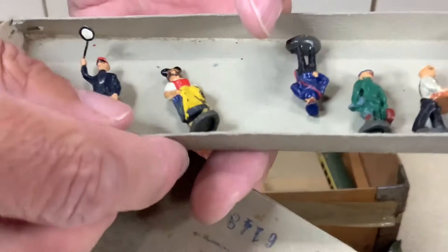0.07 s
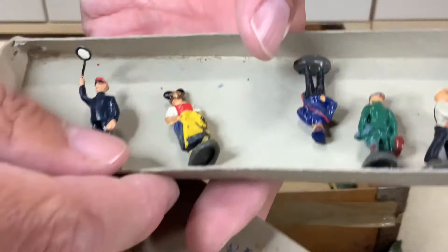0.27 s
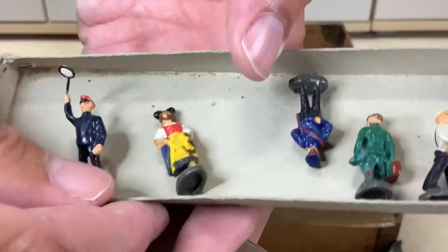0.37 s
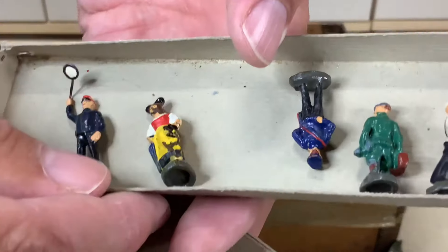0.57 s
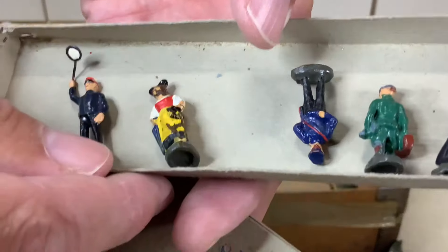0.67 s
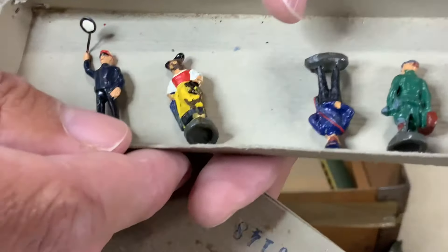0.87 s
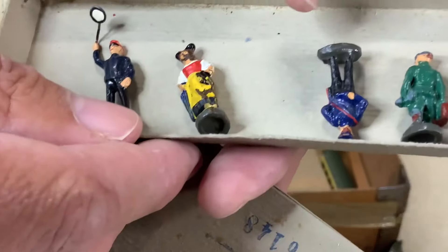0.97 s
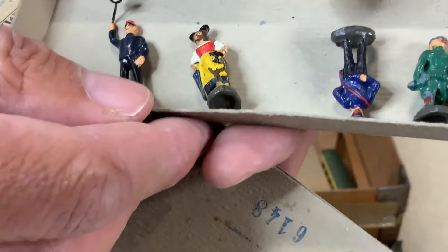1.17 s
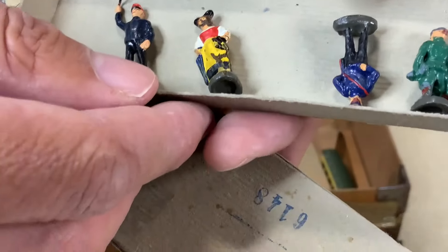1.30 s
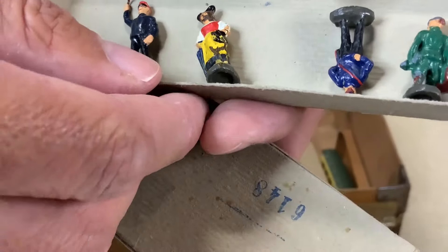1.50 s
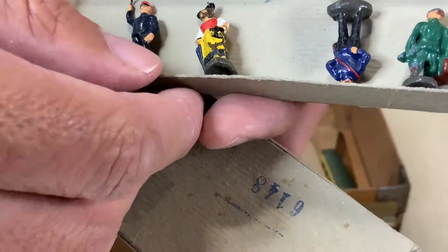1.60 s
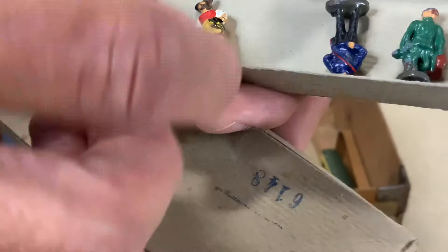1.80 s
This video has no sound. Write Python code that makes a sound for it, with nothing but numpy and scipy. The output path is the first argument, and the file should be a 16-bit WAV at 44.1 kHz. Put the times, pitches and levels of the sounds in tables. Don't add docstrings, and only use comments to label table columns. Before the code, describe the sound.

Fingers rub and shift an old card box indoors, with dry scuffs and a loud hollow clack

```python
import sys
import numpy as np
from scipy import signal
from scipy.fft import rfft, irfft
from scipy.io import wavfile
from scipy.ndimage import uniform_filter1d

SR = 44100
rng = np.random.default_rng(int(sys.argv[2]) if len(sys.argv) > 2 else 0)


def level_to_linear(level):
    exponent = np.asarray(level, float) / 20
    return 10 ** exponent


def materialize(psi):
    bounded = np.clip(np.atleast_2d(psi).T, -1, 1)
    quanta = np.round(bounded * 32767).astype(np.int16)
    wavfile.write(sys.argv[1], SR, quanta)


N = 81585
T = np.arange(N) / SR
HZ = np.fft.rfftfreq(N, 1 / SR)


def evened(x):
    return x / np.sqrt(np.mean(x ** 2) + 1e-20)


def read(points, hz=HZ):
    f, value = np.transpose(points)
    return np.interp(np.log(hz + 1), np.log(f + 1), value)


def colour(x, gain):
    return irfft(rfft(x) * gain, N)


def grit(per_s, spread_db, share, flicker_db, size):
    slip_size = level_to_linear(spread_db * np.minimum(rng.exponential(1, N), 4))
    slips = rng.standard_normal(N) * slip_size * (rng.random(N) < per_s / SR)
    flicker = evened(uniform_filter1d(uniform_filter1d(rng.standard_normal(N), size), size))
    rub = share * evened(slips) + (1 - share) * rng.standard_normal(N)
    return rub * level_to_linear(flicker_db * flicker)


def rings(modes, t, stretch, detune, rise_s):
    total = 0
    for (hz, db, t60), d in zip(modes, detune):
        total = total + level_to_linear(db - 60 * t / (t60 * stretch)) * np.sin(2 * np.pi * hz * d * t)
    return total * (1 - np.exp(-t / rise_s))


# pitch in Hz, width in Hz, level in dB.
PANEL_MODES = [(255, 130, -9), (377, 100, -4), (534.4, 116, 13.5), (801.5, 30, 2.5), (994, 140, -8),
               (1285, 91, -0.5), (1582, 53, -10.5), (2547, 55, 3), (3095, 110, 1.5), (3716, 1000, -4.5),
               (4320, 200, -14.5), (4950, 69, -1.5)]


def panels(floor):
    peaks = sum(level_to_linear(g) / np.sqrt(1 + (2 * (HZ - f) / w) ** 4) for f, w, g in PANEL_MODES)
    return floor + peaks


# peak in seconds, rise in seconds, fall in seconds, hiss in dB,
# card sound against the hiss in dB.
STROKES = [(0.042, 0.24, 0.07, -55.5, 3), (0.093, 0.1, 0.075, -54.5, -4), (0.167, 0.015, 0.0037, -49, 0),
           (0.252, 0.098, 0.082, -40.5, -2), (0.318, 0.069, 0.11, -42.5, 0), (0.396, 0.14, 0.066, -61, 15),
           (0.479, 0.019, 0.11, -60, -15), (0.59, 0.12, 0.1, -58, 9), (0.652, 0.045, 0.072, -64.5, 7),
           (0.709, 0.058, 0.11, -59, 6.5), (0.758, 0.033, 0.045, -59, -3), (0.892, 0.052, 0.12, -86, 17),
           (1.128, 0.035, 0.057, -63, -3), (1.171, 0.026, 0.085, -69.5, -4.5),
           (1.263, 0.04, 0.055, -52.5, 1), (1.30, 0.015, 0.062, -65, -1), (1.421, 0.07, 0.061, -63, -2),
           (1.47, 0.048, 0.063, -61.5, -5), (1.518, 0.033, 0.092, -56.5, -5.5),
           (1.638, 0.041, 0.049, -52, -6), (1.699, 0.045, 0.043, -54, -0.5), (1.743, 0.045, 0.075, -57, 0)]
# pitch in Hz, level in dB per Hz.
SKIN_COLOUR = [(3500, -48), (5400, -9), (6800, -0.5), (8500, -4.5), (10500, 3.5), (12500, 3), (14000, 1.5),
               (16000, -2.5)]
# pitch in Hz, level in dB per Hz.
FIBRE_COLOUR = [(900, -17), (1900, -5), (2600, 0), (3300, -7), (4600, 1.5), (5600, -4.5), (6500, -13),
                (8000, -20.5)]


def fingers():
    slips = grit(6000, 0.98, 0.35, 0.63, size=150)
    hiss = evened(colour(slips, level_to_linear(read(SKIN_COLOUR))))
    card = evened(colour(slips, level_to_linear(read(FIBRE_COLOUR)) * panels(1.0)))
    out = np.zeros(N)
    for s, rise, fall, db, card_db in STROKES:
        far = np.minimum(np.where(T < s, (s - T) / rise, (T - s) / fall), 4)
        out += level_to_linear(db - 28 * far ** 1.65) * (hiss + level_to_linear(card_db) * card)
    return out


# time in seconds, level in dB,
# upper panels in dB, bottom panel in dB.
DRAG = [(0, -51, -0.5, -6), (0.026, -46, -9, -10), (.1, -59, -8.5, -2.5), (.135, -63, -11, 1),
        (0.232, -53.5, 9, 2), (.27, -48.5, -0.5, -3.5), (.38, -47, -2.5, -4.5), (.43, -47.5, -10, -6),
        (.5, -50, 1.5, -8), (0.598, -44.5, -4, -1), (0.667, -60, 8.5, 1.5), (.76, -51.5, 1, 2),
        (.8, -56, -2, 6.5), (0.959, -63, 7, -4), (1.06, -61, -2.5, -2), (1.502, -74, 4.5, 3.5),
        (1.6, -87, -12, 5), (1.731, -79, 11, -10), (1.82, -86.5, 9, -0.5)]
# pitch in Hz, level in dB per Hz.
DRAG_COLOUR = [(100, -21), (250, 5.5), (500, 1), (700, -0.5), (1000, 1.5), (1600, 3.5), (1950, -7.5),
               (3000, -24)]


def drag():
    s, db, upper_db, bottom_db = np.transpose(DRAG)
    slips = grit(2500, 1.2, 0.41, 1.87, size=250)
    card = evened(colour(slips, level_to_linear(read(DRAG_COLOUR)) * panels(0.85)))
    low = colour(card, 1 / (1 + (HZ / 700) ** 6))
    bottom = colour(card, 1 / (1 + (HZ / 400) ** 6))
    middle, upper = low - bottom, card - low
    mix = bottom * level_to_linear(np.interp(T, s, bottom_db)) + middle + upper * level_to_linear(np.interp(T, s, upper_db))
    return mix * level_to_linear(np.interp(T, s, db))


# centre in seconds, half length in seconds,
# level in dB, start pitch in Hz, end pitch in Hz.
SCUFFS = [(0.046, 0.034, -56.5, 5200, 5300), (0.139, 0.0035, -64, 4780, 4700),
          (0.2, 0.009, -56, 1650, 1700), (0.32, 0.095, -51, 1550, 1750), (0.33, 0.12, -60, 770, 800),
          (0.386, 0.041, -46.5, 590, 510), (0.34, 0.059, -46, 4540, 4700), (0.76, 0.0082, -48, 3620, 3600),
          (.7605, 0.0032, -46.5, 3500, 3500), (1.249, 0.0073, -54, 4790, 4800),
          (1.261, 0.014, -52.5, 4650, 4560), (1.11, 0.12, -65, 1110, 1300),
          (0.938, 0.096, -63.5, 1050, 1003), (0.94, 0.069, -67, 1540, 1600), (.57, .06, -58, 830, 800),
          (1.624, .016, -64.5, 4200, 4700), (1.633, 0.0083, -56.5, 4670, 4700),
          (1.642, 0.013, -60, 4600, 4400), (1.692, 0.0098, -55, 3400, 3740),
          (1.722, 0.0063, -56, 2200, 2200), (1.743, 0.008, -59, 4300, 4300),
          (1.752, 0.031, -64, 3300, 3400), (1.75, 0.019, -63.5, 2200, 2170)]


def scuffs():
    slips = grit(3000, 3.4, 0.61, 0.89, size=60)
    out = np.zeros(N)
    for s, length, db, hz, end_hz in SCUFFS:
        at = slice(max(round((s - length) * SR), 0), round((s + length) * SR))
        u = (T[at] - s) / length
        pitch = hz + (end_hz - hz) * (u + 1) / 2
        turn = np.exp(2j * np.pi * np.cumsum(pitch) / SR)
        r = np.exp(-np.pi * 0.085 * hz / SR)
        smooth = signal.lfilter([1], [1, -2 * r, r * r], slips[at] / turn)
        song = evened((turn * smooth).real)
        out[at] += level_to_linear(db) * np.cos(np.pi * u / 2) ** 2 * song
    return out


def patchy(x):
    z = signal.stft(x, nperseg=512)[2]
    field = uniform_filter1d(rng.standard_normal(z.shape[1:]), size=5, axis=0)
    field = uniform_filter1d(field, size=18, axis=1)
    wander_db = 3.5 * evened(field)
    return signal.istft(z * level_to_linear(wander_db), nperseg=512)[1][:, :N]


# time in seconds, peak in dB, thud in dB, tick in dB,
# favoured pitch in Hz.
KNOCKS = [(.1655, -31.5, -32, -20, 2820), (0.2376, -26, -1, -38, 1240), (.249, -30.5, -5, -42, 1400),
          (0.4415, -7, -15.5, -8, 2480), (0.5131, -21.5, -10, -40, 1920), (.5285, -37.5, -25, -35, 1400),
          (.532, -39, -25, -35, 1100), (.590, -31, -11, -39, 3020), (0.605, -35, 6, -22, 3030),
          (0.689, -34.5, -18, -19, 3730), (.7045, -34, -30, -7, 3500), (0.7215, -35.5, -30, -28, 2400),
          (.7235, -37.5, -23, -35, 1110), (0.7357, -34, 2, -39.5, 1500), (.7375, -30.5, -30, -9, 3330),
          (.739, -36.5, -20, -39, 1000), (0.7595, -31, -21, -17, 2680), (.765, -44, -15, -33, 1500),
          (0.7747, -33, -4, -40, 1740), (.7785, -37, 0.5, -40, 940), (1.264, -37.5, -33.5, -5, 3000),
          (1.6975, -42, -26, -30.5, 2000), (1.698, -50, -37, -34, 588)]
# pitch in Hz, level in dB, time to fall 60 dB in seconds.
TRAY_MODES = [(590, -6.5, 0.14), (902, -2, 0.022), (1300, -17, 0.05), (1460, -5.5, 0.059),
              (1543, -5.5, .04), (1703, -7, 0.048), (2208, 1, 0.04), (2420, -2.5, 0.063), (2643, -2, 0.032),
              (2654, -0.5, 0.023), (3616, 2, 0.03), (3820, -6.5, .03), (4610, 2, 0.025), (5794, 5, 0.021)]
# pitch in Hz, level in dB, time to fall 60 dB in seconds.
THUD_MODES = [(185, -8.5, 0.036), (291.7, 6.5, 0.021), (407, -4.5, 0.034), (575, -10.5, 0.049)]


def knocks():
    out, t = np.zeros(N), np.arange(6000) / SR
    for s, db, thud_db, tick_db, colour_hz in KNOCKS:
        noise = rng.standard_normal((2, len(t)))
        detune = rng.uniform(0.96, 1.003, len(TRAY_MODES))
        stretch = max(1 + 0.031 * (db + 5.0), .2)

        modes = [(hz, g - 7 * np.log2(hz / colour_hz) ** 2, t60) for hz, g, t60 in TRAY_MODES]
        ring = rings(modes, t, stretch, detune, 0.00009 / stretch ** 2)
        damping = 0.23 + 0.73 / (1 + (t * colour_hz / (19.2 * stretch)) ** 8)
        ring *= damping / abs(ring).max()

        tick = np.diff(noise[0], prepend=0) * (level_to_linear(-60 * t / 0.0022) + level_to_linear(-15.5 - 60 * t / 0.029))

        late = np.maximum(t - 0.00365, 0)
        thud = rings(THUD_MODES, late, stretch, detune, 0.0019)

        band = signal.butter(2, [colour_hz * 0.495, colour_hz * 1.455], "band", fs=SR)
        fade = level_to_linear(-10.0 - 60 * t / (0.038 * stretch)) + level_to_linear(-16 - 60 * t / 0.19)
        rattle = signal.lfilter(*band, noise[1]) * np.minimum(t / 0.0018, 1) * fade

        sound = ring + level_to_linear(tick_db) * tick + level_to_linear(thud_db) * thud + rattle
        part = out[round(s * SR):][:len(t)]
        part += level_to_linear(db) * sound[:len(part)]
    return colour(out, 1 / (1 + (140 / (HZ + 1)) ** 4))


# time in seconds, level in dB, width in seconds, pitch in Hz.
JOLTS = [
    (0.106, -61, 0.016, 90.6),
    (.252, -50.5, 0.01, 71.6),
    (.285, -59, .0075, 60),
    (0.351, -58, .008, 120),
    (.465, -62, 0.018, 45),
    (0.562, -63, 0.013, 90),
    (0.769, -59.5, 0.016, 80),
    (1.056, -67.5, 0.011, 110.4),
]


def jolts():
    out = np.zeros(N)
    for s, db, width, hz in JOLTS:
        out += level_to_linear(db) * np.exp(-((T - s) / width) ** 2) * np.sin(2 * np.pi * hz * (T - s))
    return out


# pitch in Hz, level in dB per Hz.
AIR_COLOUR = [(12, -47.5), (20, -6), (86, -0.5), (146, -10), (1910, -17.5), (2600, -10.5), (3250, -13),
              (4540, -12.5), (16000, -21)]


def air():
    floor = evened(colour(rng.standard_normal(N), level_to_linear(read(AIR_COLOUR))))
    hum_hz, hum_width_hz = 89, 14
    waver = colour(rng.standard_normal(N), 1 / (1 + (2 * (HZ - hum_hz) / hum_width_hz) ** 2))
    hum = evened(evened(waver) + 1.2 * np.sin(2 * np.pi * hum_hz * T))
    return level_to_linear(-70.0) * floor + level_to_linear(-77) * hum


def scene():
    hits = knocks()
    scatter = rng.standard_normal(600) * level_to_linear(-60 * T[:600] / 0.014)
    scattered = signal.oaconvolve(hits, scatter / np.linalg.norm(scatter))[:N]
    rubs = patchy(np.array([fingers() + drag() + scuffs() for _ in range(2)]))
    return rubs + np.array([air(), air()]) + np.array([scattered, hits]) + jolts()


def gate(x):
    top_hz, faint_top_hz = 15850, 15300
    hz, _, z = signal.stft(x, SR, nperseg=1024)
    high = hz[:, None] > 5200
    size = uniform_filter1d(abs(z), size=2, axis=2)
    weak = (size < .75 * uniform_filter1d(size, size=24, axis=1)) & high
    band = uniform_filter1d(uniform_filter1d(size, size=9, axis=1), size=3, axis=2)
    weak |= (band < .72 * uniform_filter1d(band, size=40, axis=1)) & high

    top = size[:, (hz > faint_top_hz) & (hz < top_hz)].mean(axis=(0, 1))
    faint = top < np.sort(top)[len(top) // 3]
    weak |= (hz[:, None] > top_hz) | ((hz[:, None] > faint_top_hz) & faint)

    level = abs(z).mean(axis=(0, 1))
    sudden = level > 4 * np.roll(level, 2)
    calm = uniform_filter1d(1. * sudden, size=3) < .1
    return signal.istft(z * ~(weak & calm), SR, nperseg=1024)[1][:, :N]


def top_cut(x):
    return signal.sosfilt(signal.butter(12, 17030, fs=SR, output="sos"), x)


# pitch in Hz, turn in radians.
PORT_TURN = [(0, 0), (370, 2.7), (740, 8.6), (980, 10.3), (1300, 8.4), (2000, 7.1), (2900, 7.2),
             (3900, 5.0), (5600, 3.14)]
# pitch in Hz, difference in dB.
PORT_DB = [(100, -1), (700, -3), (1300, -8), (2100, -6), (2500, 1), (3200, -4), (4300, 3), (5200, 0)]
# pitch in Hz, likeness from 0 to 1.
LIKENESS = [(100, .96), (400, .9), (1000, .6), (1500, .88), (3200, .75), (4500, .85), (8500, .76),
            (11000, .92)]


def record(dry):
    dry = dry * np.minimum(T / .004, 1)
    same, tilt = read(LIKENESS), level_to_linear(read(PORT_DB) / 2)
    top_db = -45.0 / (1 + (16900 / (HZ + 1)) ** 120) - 12.0 / (1 + (15300 / (HZ + 1)) ** 40)
    top = level_to_linear(top_db)
    lag_s = 1 / 1271
    turn = np.exp(1j * (np.interp(HZ, *np.transpose(PORT_TURN)) - 2 * np.pi * HZ * lag_s))
    left = colour(dry[1], same * turn * tilt * top)
    left += colour(dry[0], np.sqrt(1 - same ** 2) * tilt * top)
    right = colour(dry[1], top / tilt)
    mid, side = gate(np.array([left + right, left - right])) / 2
    return top_cut(np.array([mid + side, mid - side]))


dry = scene()
out = record(dry)
materialize(out)
```